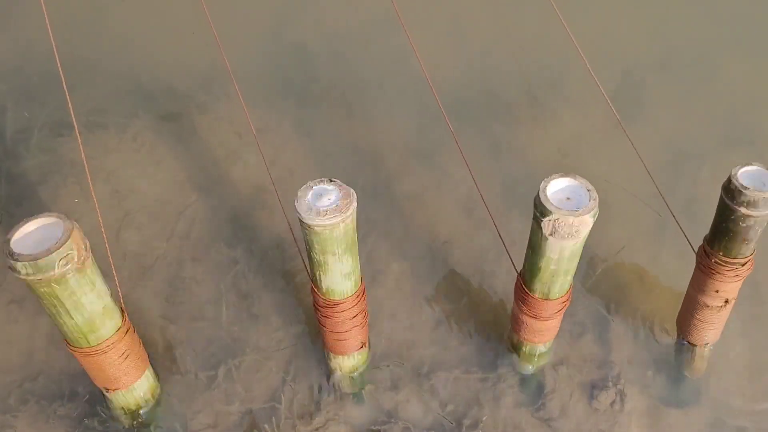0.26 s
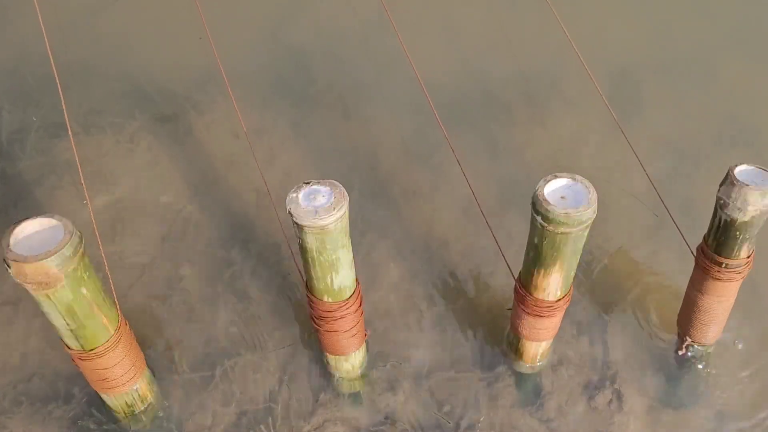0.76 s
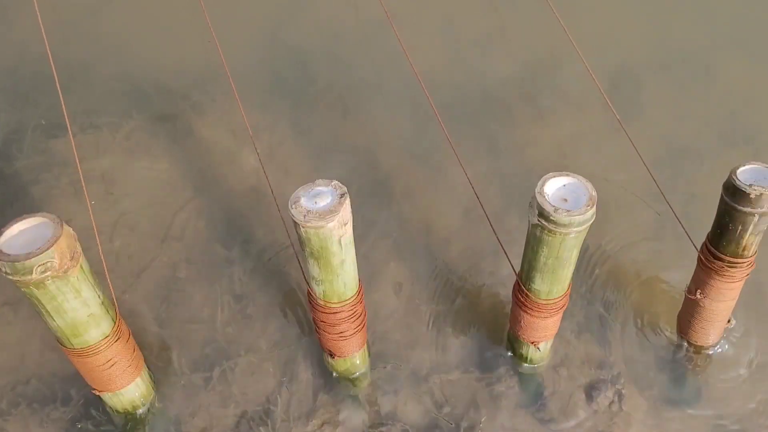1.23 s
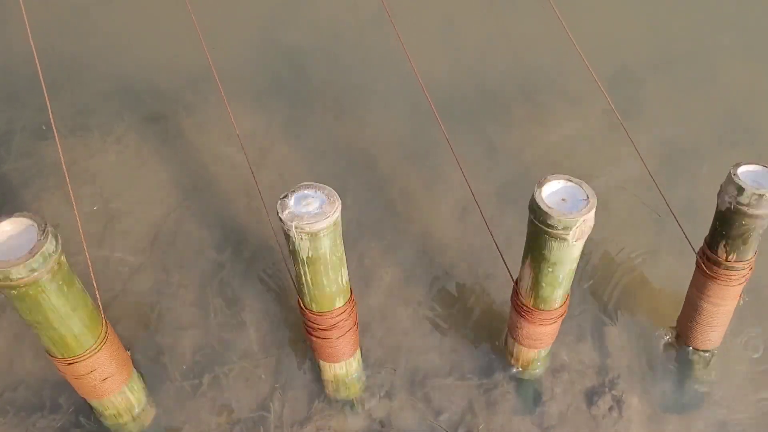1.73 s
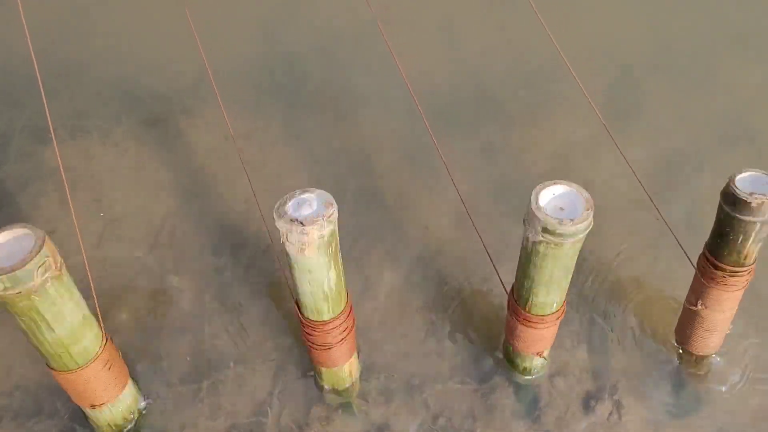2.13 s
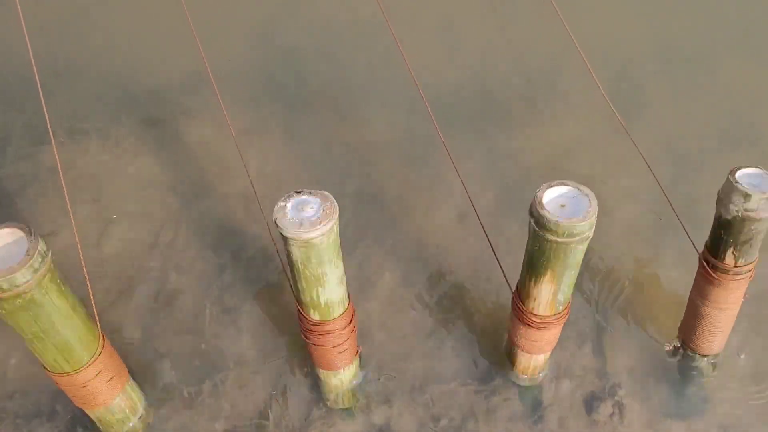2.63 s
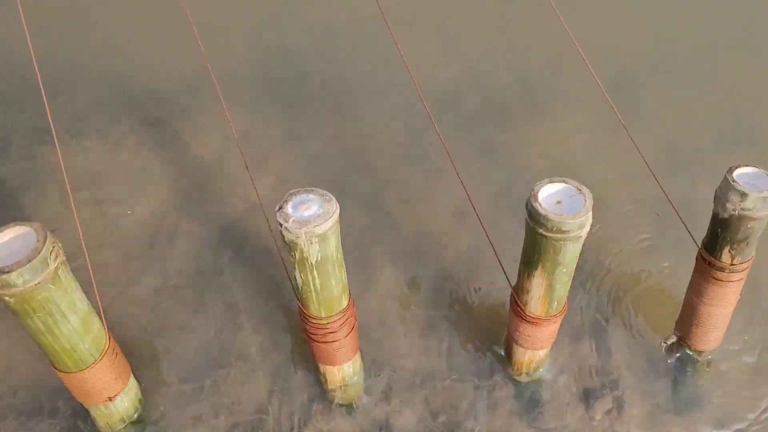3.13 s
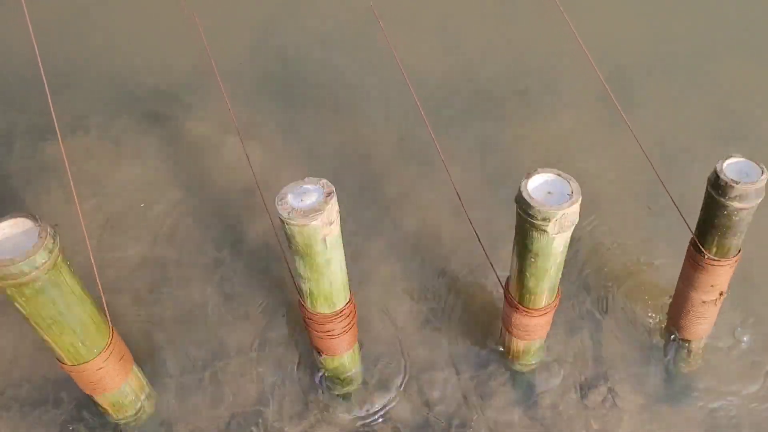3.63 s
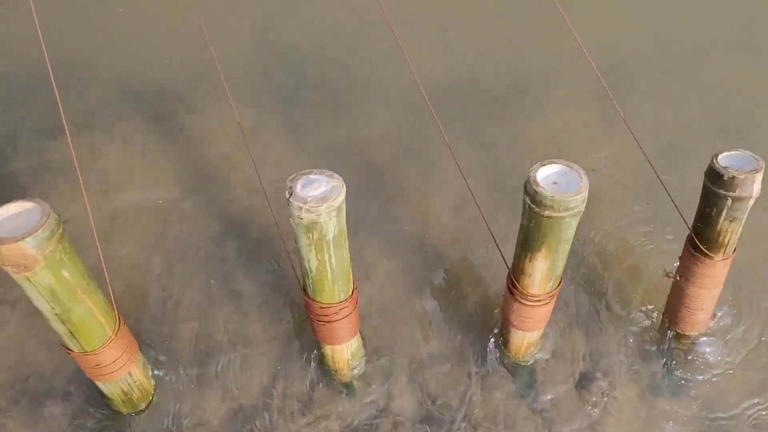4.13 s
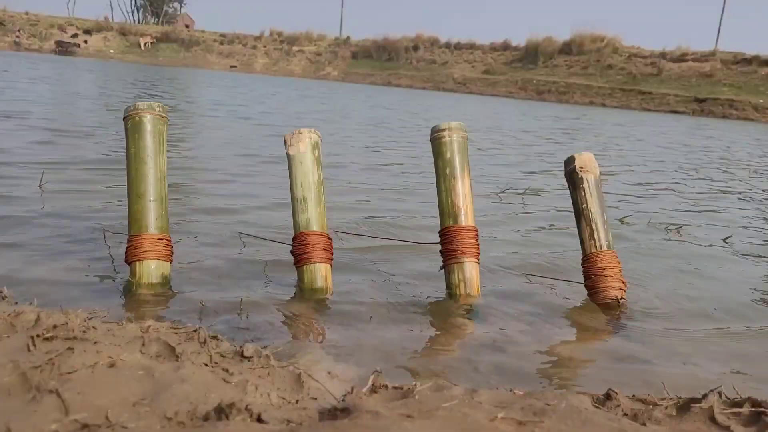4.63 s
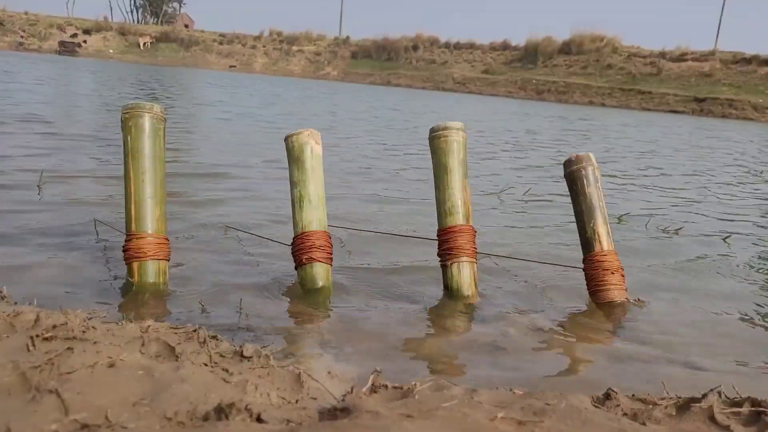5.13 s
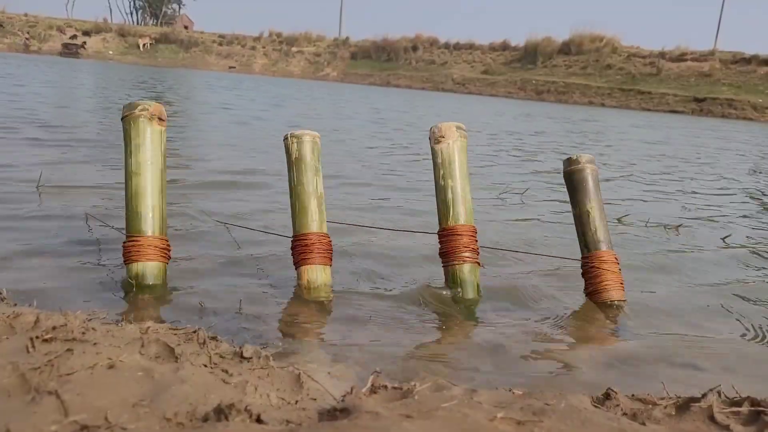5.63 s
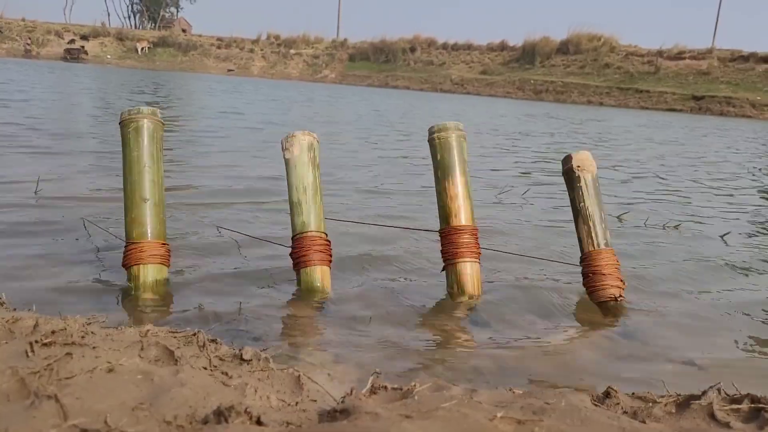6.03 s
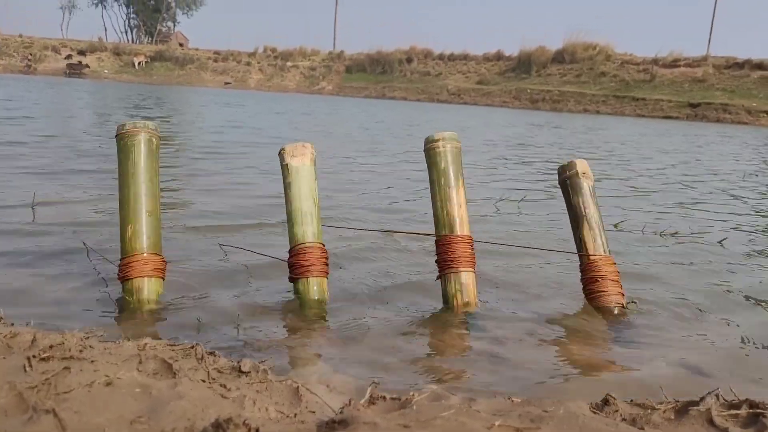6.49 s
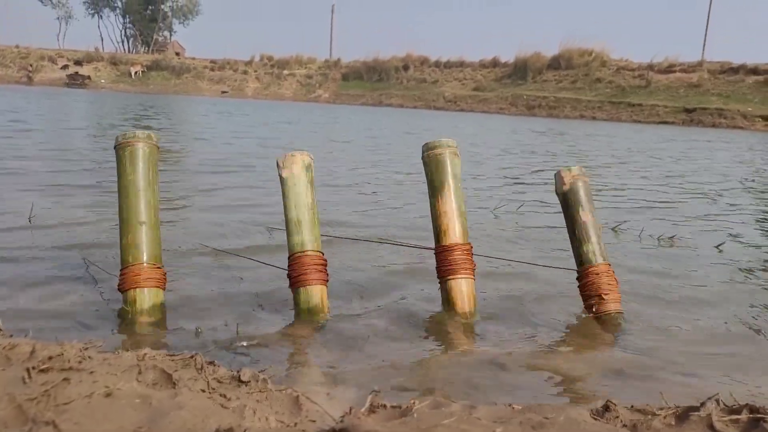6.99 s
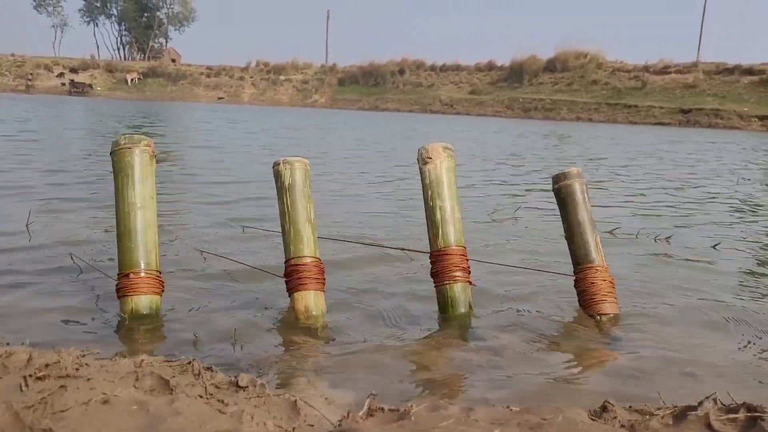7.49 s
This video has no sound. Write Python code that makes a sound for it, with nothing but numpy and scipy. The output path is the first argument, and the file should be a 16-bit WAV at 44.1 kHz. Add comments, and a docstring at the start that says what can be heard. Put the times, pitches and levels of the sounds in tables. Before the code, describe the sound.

From 0 to about 3.3 s it is quiet at a pond's edge: soft lapping, thin slosh and fine spray, faint low wind buffets, and tiny bright droplet ticks. Ripples slap hollow bamboo stakes in clusters, around 0.5-0.7 s and 1.85-2.35 s, each a dull thud with a very short high woody ring. From 3.3 s the slaps crowd together, with gurgling, upward-gliding bubbles and firmer gusts, peaking near 4.1-4.45 s. At 4.5 s it sinks and is cut to a few hundredths of a second of silence. From 4.6 s another spot fades in quickly: a distant, muffled single-cylinder diesel thumps evenly, about ten beats a second, to the end at 7.75 s, with low rumble and a wavering drone that grows. Wind thumps the microphone strongest around 4.7-5.2 and 5.8-6.2 s; water stays faint, with occasional drips.

```python
"""At a pond's edge, wind buffets two microphone ports while ripples lap, slosh and spray (filtered noise).
Droplets tick (short bright noise), ripples slap hollow bamboo stakes (thuds and rings), bubbles sing (gliding tones).
At 4.5 s this sinks and is cut to a short silence; a second spot then fades in, with a far machine's drone.
There a slow single-cylinder diesel thumps about ten times a second: each cycle is a row of ringing gas pushes."""
import sys
import numpy as np
from scipy import signal
from scipy.io import wavfile
from scipy.ndimage import uniform_filter1d

SR = 44100
rng = np.random.default_rng(int(sys.argv[2]) if len(sys.argv) > 2 else 0)


def transcribe(signal):
    """Save signal, clipped to [-1, 1], as a 16-bit WAV file at the path in sys.argv[1]."""
    frames = np.atleast_2d(signal).T
    limited = np.clip(frames, -1, 1)
    pcm = np.round(limited * 32767).astype(np.int16)
    wavfile.write(sys.argv[1], SR, pcm)


N = 341775
T = np.arange(N) / SR
SECOND_SPOT_S = 4.592  # the second spot begins here


def undb(db):
    """Gain of a level in dB."""
    return 10 ** (np.asarray(db) / 20)


def unit(x):
    """Scale to rms 1."""
    return x / np.sqrt(np.mean(x ** 2))


def peak_one(x):
    """Scale each channel to a peak of 1."""
    return x / np.abs(x).max(axis=-1, keepdims=True)


def curves(table):
    """Columns of a timed table, drawn as lines with one value a sample."""
    s, *columns = np.transpose(table)
    return [np.interp(T, s, c) for c in columns]


def band(x, lo_hz, hi_hz, order=2):
    """Keep only the sound between two frequencies."""
    return signal.sosfilt(signal.butter(order, [lo_hz, hi_hz], "band", fs=SR, output="sos"), x)


def ring(x, hz, t60):
    """One tone that falls 60 dB in t60 seconds; an impulse of 1 peaks near 1."""
    r, w = np.exp(-np.log(1000) / (t60 * SR)), 2 * np.pi * hz / SR
    return signal.lfilter([0, np.sin(w)], [1, -2 * r * np.cos(w), r * r], x)


def walk(rate):
    """Random levels held 1 / rate seconds and joined by slopes; rms 1."""
    k = int(SR / rate)
    steps = np.repeat(rng.standard_normal(N // k + 1), k)
    return unit(uniform_filter1d(steps, k)[:N])


def add(out, s, sound):
    """Mix a short sound in at time s."""
    i = int(s * SR)
    out[..., i:i + sound.shape[-1]] += sound[..., :max(N - i, 0)]


def pan_gains(pan_db):
    """Gains of the left and right port, from left minus right in dB."""
    return undb(np.array([[pan_db], [-pan_db]]) / 2)


def ports(x, pan_db, lag_s):
    """The right port hears it a little later."""
    late = np.interp(T - lag_s, T, x)
    return np.array([x, late]) * pan_gains(pan_db)


def after(rows, under_db, fall_s):
    """Envelope that jumps at each event, under_db from its peak, and dies away."""
    kicks = np.zeros(N)
    for s, db, *_ in rows:
        add(kicks, s, undb([db + under_db]))
    return signal.lfilter([1], [1, -np.exp(-1 / (fall_s * SR))], kicks)


def grains(points, per_s, scatter_db, smear_s, hush_db, flicker_db, like):
    """Third-octave bands of short noisy pops over a bed of noise; an octave shares its pops."""
    hz_at, db_at = np.transpose(points)
    out, shared, fall = 0, walk(25), np.exp(-1 / (smear_s * SR))
    octaves = np.arange(1 / 6, np.log2(hz_at[-1] / hz_at[0]), 1 / 3)
    for step, hz in enumerate(hz_at[0] * 2 ** octaves):
        if step % 3 == 0:
            sizes = undb(scatter_db * np.minimum(rng.exponential(size=N), 3))
            starts = (rng.random(N) < per_s / SR) * sizes
            pops = unit(signal.lfilter([1], [1, -fall], starts))
            raw = (pops + undb(hush_db)) * rng.standard_normal((2, N))
            # the right port is partly a copy of the left, 7 samples late
            raw[1] = like * np.roll(raw[0], 7) + np.sqrt(1 - like ** 2) * raw[1]
        db = np.interp(np.log(hz), np.log(hz_at), db_at) + flicker_db * shared + 2.0 * walk(20)
        slice_ = band(raw, hz * 2 ** (-1 / 6), hz * 2 ** (1 / 6), order=3)
        out = out + (-1) ** step * undb(db) * slice_
    return unit(out)


# Gusts buffeting the ports. Each row: start in seconds, length in seconds, level in dB, left minus right in dB.
GUST_ROWS = [(0.0, 0.095, -53, -5), (0.242, 0.02, -46, -22), (0.35, 0.028, -51, -27),
             (0.68, 0.074, -55.5, -14.5), (0.817, 0.19, -52, -14.5), (1.09, 0.17, -47.5, -15),
             (1.344, 0.017, -48.5, -10), (1.644, 0.2, -52, -6), (2.44, 0.2, -50.5, -5.5),
             (3.018, 0.16, -44, 4.5), (3.327, 0.11, -39.5, -8.5), (3.492, 0.25, -41.5, -11.5),
             (4.036, 0.13, -40.5, -20), (4.176, 0.034, -32.5, -20.5), (4.248, 0.12, -34.5, -20.5),
             (4.384, 0.14, -32.5, -16.5), (4.662, 0.4, -34.5, 2.5), (5.118, 0.038, -29, -9.5),
             (5.252, 0.79, -41, 11), (5.779, 0.4, -32, -4), (6.196, 0.15, -52, -2)]
GUST_RISE_S, GUST_FALL_S = 0.019, 0.042
FIRST_LULL_DB, SECOND_LULL_DB = -57, -44  # breeze between gusts at each spot


def wind():
    """Eddies thud on each port on their own; a harder gust reaches higher in pitch."""
    out = []
    for side in (1, -1):
        gain = undb(np.where(T < SECOND_SPOT_S, FIRST_LULL_DB, SECOND_LULL_DB))
        for s, length, db, pan_db in GUST_ROWS:
            rise = np.clip((T - s) / GUST_RISE_S + .5, 0, 1)
            fall = np.exp(-np.maximum(T - s - length, 0) / GUST_FALL_S)
            gain = np.hypot(gain, undb(db + side * pan_db / 2) * rise * fall)
        low = unit(band(rng.standard_normal(N), 39.1, 95.6, order=3)) * undb(2.94 * walk(15))
        high = unit(band(rng.standard_normal(N), 86.6, 202)) * undb(4.15 * walk(30))
        high_share = undb(-4.0) * (gain / undb(-22.0)) ** 0.62
        out.append(gain * (low + high_share * high))
    return np.array(out)


# Ripples among the stakes, first spot. Each row: time in seconds, lapping in dB, slosh in dB, spray in dB.
RIPPLE_LEVELS = [(0.0, -68, -62.5, -63.5), (0.62, -64, -57, -57.5), (1.68, -66.5, -64.5, -65),
                 (2.12, -60, -61.5, -63), (2.47, -68, -61, -61), (3.37, -60.5, -60, -62.5),
                 (3.55, -54, -56, -58), (4.06, -54, -49, -51.5), (4.25, -49, -49.5, -47),
                 (4.35, -49.5, -45, -48.5), (4.46, -55, -56, -60)]
# Water at the second spot. Each row: time in seconds, far drone in dB, slosh in dB, spray in dB.
SHORE_LEVELS = [(4.6, -57.5, -61, -66), (4.9, -60.5, -59.5, -62), (5.8, -56.5, -63.5, -61),
                (6.7, -54, -63.5, -63.5), (7.75, -49.5, -62.5, -61)]


def water_levels():
    """Lapping, slosh and spray in dB; lapping stops just as the second spot begins."""
    return np.where(T < SECOND_SPOT_S, curves(RIPPLE_LEVELS), curves(SHORE_LEVELS))


def churn():
    """Each large slap churns the water for a moment."""
    return after(SLAP_ROWS, under_db=-27, fall_s=.015)


# Tone balance of the lapping. Each row: frequency in Hz, relative level in dB per Hz.
LAP_BALANCE = [(200, 3.5), (350, -5), (650, -6), (950, -5), (1200, -19)]


def lapping():
    """Low, slow pops of water, nearly alike on both ports, swelling after each slap."""
    level = undb(water_levels()[0]) + churn()
    return level * grains(LAP_BALANCE, 45, 4.7, 0.0039, -1.7, 2.3, 0.94) * (T < 4.6)


# Tone balance of the slosh. Each row: frequency in Hz, relative level in dB per Hz.
SLOSH_BALANCE = [(1400, -1.5), (1800, 6.5), (2200, -10), (2700, 7.5), (3300, 1), (4500, -0.5), (6500, -14)]
CHURN_TREBLE_DB = -5  # share of the churn in the slosh


def slosh():
    """Denser, brighter pops of water, also swelling after each slap."""
    level = undb(water_levels()[1]) + undb(CHURN_TREBLE_DB) * churn()
    return level * grains(SLOSH_BALANCE, 150, 4.5, 0.0031, 0.71, 1.0, 0.33)


# Tones of a bamboo stake. Each row: frequency in Hz, relative level in dB, seconds to fall 60 dB.
STAKE_MODES = [(1554, -17, 0.077), (1680, -31, 0.016), (1815, -6.5, 0.04), (1830, -1.5, 0.081),
               (1867, -9, 0.038), (2950, -12, 0.04), (3260, -6.5, 0.05), (3880, -12.5, 0.032)]
STAKE_LOW_HZ = 1430  # the tube radiates little below this
RING_LAG_S = .00023  # the right port hears the ring this late


def stake(x, tune=1):
    """The hollow bamboo rings at its modes."""
    tones = sum(undb(db) * ring(x, hz * tune, t60) for hz, db, t60 in STAKE_MODES)
    return band(tones, STAKE_LOW_HZ, 9000, order=4)


def stake_hum():
    """The slosh keeps the stakes humming with random taps over steady noise."""
    sizes = undb(9.4 * np.minimum(rng.exponential(size=N), 2))
    taps = unit((rng.random(N) < 90 / SR) * sizes) + 1.3 * rng.standard_normal(N)
    over_slosh_db = np.where(T < 4.6, 0.5, -8)
    return ports(unit(stake(taps)), -8.0, RING_LAG_S) * undb(water_levels()[1] + over_slosh_db)


# Tone balance of the spray. Each row: frequency in Hz, relative level in dB per Hz.
SPRAY_BALANCE = [(5000, 7), (7000, 11.5), (9000, 7), (12000, 7), (16000, -6)]
MIST_DB, MIST_S = -18, 0.0061  # spray thrown up with each droplet: under its peak, and its decay


def spray():
    """Fine high pops, almost unrelated on the two ports, with a burst at each droplet."""
    hiss = grains(SPRAY_BALANCE, 110, 1.3, 0.002, 2.7, 1.0, 0.02)
    # the left port faces the spray and keeps its highest treble
    hiss[0] += undb(3.5) * band(hiss[0], 11470, 22000)
    return (undb(water_levels()[2]) + after(TICK_ROWS, MIST_DB, MIST_S)) * hiss


# Droplets ticking. Each row: time in seconds, peak in dB midway between ports, pitch in Hz, left minus right in dB.
TICK_ROWS = [(0.0457, -33.5, 13650, 9), (0.285, -34.5, 13200, 5), (0.4553, -40, 12900, 14),
             (0.563, -49, 12300, 27), (0.7522, -45, 12700, 18), (1.3588, -43, 10200, 0.5),
             (1.8936, -48, 12100, 1.0), (1.949, -44, 11800, 8), (2.474, -40, 12700, -2),
             (3.5647, -32.5, 11050, 6), (3.817, -40, 11400, 20), (3.9863, -38, 6640, -19),
             (4.0135, -37, 7000, -2), (4.2345, -39, 7300, -6), (4.43, -35, 12100, 6),
             (4.4894, -40, 7200, 0), (4.8583, -44, 12500, -8), (4.9603, -44.5, 7750, 0.0),
             (5.66, -40.5, 8100, 12), (6.687, -52, 11400, 12), (7.2315, -48, 11400, 8),
             (7.626, -42, 12300, 4.5)]


def ticks():
    """Tiny droplets: a few milliseconds of bright noise."""
    out, t = np.zeros((2, N)), np.arange(600) / SR
    for s, db, hz, pan_db in TICK_ROWS:
        burst = rng.standard_normal((2, len(t))) * np.exp(-t / 0.0029)
        tick = band(burst, hz * 0.96, min(hz * 1.07, 16000), order=1)
        add(out, s, undb(db) * pan_gains(pan_db) * peak_one(tick))
    return out


PATTER_OVER_LAP_DB, PATTER_RING_DB = 13.5, -3  # strongest slap over the lapping; its ring over its thud


def patter():
    """Many small random slaps that follow the lapping level, as rows like those of the large slaps."""
    when, pitch, weak, dull = rng.random((170, 4)).T
    when = 4.5 * when ** 0.62  # more of them later on
    db = curves(RIPPLE_LEVELS)[0][(when * SR).astype(int)] + PATTER_OVER_LAP_DB - 12 * weak
    return np.transpose([when, db, 400 * 2.4 ** pitch, db + PATTER_RING_DB - 2.9 * dull])


# Ripples slapping the stakes. Each row: time in seconds, thud peak in dB, thud pitch in Hz, stake ring in dB rms;
# both levels are midway between the ports.
SLAP_ROWS = [(0.456, -46.5, 354, -51), (0.505, -34.5, 720, -37.5), (0.511, -36, 1310, -55),
             (0.518, -42, 720, -57), (0.558, -46, 660, -69), (0.627, -48, 680, -65),
             (0.648, -32.5, 980, -38.5), (0.655, -37.5, 800, -43.5), (0.694, -52, 570, -51),
             (0.708, -47, 600, -48), (0.785, -59, 900, -55), (1.31, -46, 570, -68), (1.366, -44, 654, -52),
             (1.849, -46, 834, -47), (1.878, -45, 764, -61), (1.965, -47, 720, -58), (1.977, -40, 700, -44),
             (1.997, -45, 550, -46), (2.014, -39.5, 800, -62), (2.032, -42, 790, -53),
             (2.057, -52, 600, -45), (2.112, -56, 550, -63), (2.147, -46, 650, -55),
             (2.18, -39.5, 650, -51), (2.243, -34.5, 690, -40.5), (2.258, -37.5, 700, -59),
             (2.266, -61, 600, -74), (2.284, -61, 900, -74), (2.3, -61, 700, -67), (2.315, -48, 650, -73),
             (2.332, -42, 690, -70), (2.475, -48, 729, -49), (2.79, -46.5, 674, -60),
             (2.841, -41.5, 750, -53), (2.864, -46, 594, -53), (2.924, -46, 510, -62),
             (3.019, -46, 318, -49.5), (3.333, -46, 570, -44.5), (3.419, -37.5, 600, -44),
             (3.588, -48, 633, -44), (3.619, -34, 725, -42), (3.566, -42, 600, -50),
             (3.645, -41, 600, -34.5), (3.67, -43, 393, -44), (3.712, -44, 600, -49),
             (3.727, -36, 725, -35), (3.802, -41, 810, -44), (3.817, -37, 848, -37), (3.874, -46, 450, -51),
             (3.897, -39, 570, -45), (3.921, -40, 573, -36), (3.943, -46, 630, -42), (3.973, -50, 700, -57),
             (3.982, -53, 592, -41), (4.038, -38, 684, -34), (4.083, -36, 650, -44),
             (4.097, -33, 554, -29.5), (4.133, -36, 800, -35.5), (4.152, -29, 910, -46),
             (4.164, -29, 600, -50.5), (4.212, -40, 800, -58), (4.226, -31, 730, -51),
             (4.236, -42, 890, -50), (4.246, -27, 724, -31.5), (4.257, -24, 1300, -30.5),
             (4.267, -31, 900, -57), (4.3, -39, 536, -46), (4.337, -31, 1000, -44),
             (4.343, -30.5, 1100, -55), (4.366, -28, 600, -33.5), (4.383, -32, 1200, -45),
             (4.403, -33, 574, -57), (4.413, -31, 900, -47), (4.436, -31.5, 1100, -48),
             (4.467, -41, 507, -41)]
BLOW_S, BLOW_EDGE, BLOW_TOP_HZ = .004, 3.5, 2200  # decay; sharp first contact; water is soft above this
SPLAT_DB, SPLAT_S = -9, .007  # ragged tail of each thud
CRACK_DB = -4  # crack's peak over the ring's level
STAKE_SPREAD = .008  # each blow lands on another stake, a little off in pitch
THUD_CYCLES = 6  # cycles for a thud to fall 60 dB
THUD_PAN_DB, RING_PAN_DB, PAN_SPREAD_DB = 0.5, -4.5, 5.5  # left minus right, and its scatter
THUD_LAG_S = 0.00012  # right port late


def slaps():
    """A sharp, dull thud with a ragged tail and a few-millisecond crack, while the stake rings."""
    out, t = np.zeros((2, N)), np.arange(3500) / SR
    soft = signal.butter(2, BLOW_TOP_HZ, fs=SR, output="sos")
    for s, db, hz, ring_db in np.vstack([SLAP_ROWS, patter()]):
        blow, splat = rng.standard_normal((2, len(t)))
        blow = blow * np.exp(-t / BLOW_S)
        push = signal.sosfilt(soft, blow + BLOW_EDGE * (t == 0))
        crack = band(blow, 1800, 4500)
        tone = stake(push, 1 + STAKE_SPREAD * blow[0])
        splat = band(splat * np.exp(-t / SPLAT_S), hz * 0.53, hz * 1.78)
        knock = band(ring(1. * (t == 0), hz, THUD_CYCLES / hz), hz / 2, hz * 2, order=1)
        thud = np.sign(blow[0]) * peak_one(knock) + undb(SPLAT_DB) * peak_one(splat)
        thud = undb(db) * peak_one(thud)
        # the ring's level is that of its first 10 ms
        bright = undb(CRACK_DB) * peak_one(crack) + tone / tone[:SR // 100].std()
        bright = undb(ring_db) * bright
        scatter_db = PAN_SPREAD_DB * rng.standard_normal()
        for sound, pan_db, lag_s in ((thud, THUD_PAN_DB, THUD_LAG_S), (bright, RING_PAN_DB, RING_LAG_S)):
            left, right = pan_gains(pan_db + scatter_db) * sound
            add(out[0], s, left)
            add(out[1], s + lag_s, right)
    return out


def froth():
    """Small random bubbles that follow the lapping level, as rows like those of the large ones."""
    when, size, rise, life, weak = rng.random((70, 5)).T
    when = 4.5 * when ** 0.4  # most of them later on
    start_hz = 450 * 3.2 ** size
    end_hz = start_hz * (0.94 + 1.02 * rise ** 2)
    length = (8 + 14 * life) / start_hz
    db = curves(RIPPLE_LEVELS)[0][(when * SR).astype(int)] + 4 - 9 * weak
    return np.transpose([when, start_hz, end_hz, length, db])


# Bubbles. Each row: time in seconds, start pitch in Hz, end pitch in Hz, length in seconds, level in dB.
BUBBLE_ROWS = [(0.953, 702, 613, 0.074, -54), (1.304, 457, 740, 0.028, -46),
               (1.532, 753, 663, 0.042, -52.5), (2.162, 691, 650, 0.021, -49),
               (3.044, 558, 564, 0.034, -48.5), (3.292, 700, 790, 0.035, -53), (3.75, 587, 617, 0.038, -43),
               (3.938, 503, 2000, 0.021, -42.5), (4.035, 2690, 3350, 0.012, -42),
               (4.053, 477, 1920, 0.03, -34), (4.1, 1900, 3030, 0.049, -33), (4.164, 530, 1280, 0.021, -37),
               (4.225, 2820, 2850, 0.013, -36), (4.24, 600, 1500, 0.028, -36),
               (4.252, 1070, 2500, 0.019, -32), (4.295, 600, 1100, 0.0075, -43),
               (4.37, 1540, 1530, 0.022, -33), (4.14, 690, 1100, 0.018, -46),
               (4.394, 553, 1400, 0.013, -40), (4.413, 1550, 1560, 0.016, -34),
               (4.435, 1510, 1570, 0.017, -30.5), (4.484, 950, 1800, 0.022, -41.5)]
GLIDE_BEND, WOBBLE_DB = 2.1, 4  # pitch moves slowly, then quickly; the level wavers


def bubbles():
    """Trapped air sings a short glide as it nears the surface."""
    out = np.zeros(N)
    for s, start_hz, end_hz, length, db in np.vstack([BUBBLE_ROWS, froth()]):
        u = np.linspace(0, 1, int(length * SR))
        waver = np.interp(u, np.linspace(0, 1, 8), rng.standard_normal(8))
        wobble = unit(undb(WOBBLE_DB * waver))
        swell = np.sqrt(np.sin(np.pi * u) + 1e-9)
        hz = start_hz * (end_hz / start_hz) ** u ** GLIDE_BEND
        tone = np.sin(2 * np.pi * np.cumsum(hz) / SR)
        add(out, s, undb(db) * wobble * swell * tone)
    return ports(out, -0.21, 0.00023)


# Far machine casing. Each row: frequency in Hz, half width in Hz, relative level in dB,
# right port late in milliseconds, likeness of the ports from 0 to 1.
DRONE_BANDS = [(610, 220, -11, 0.24, .8), (950, 55, 7.5, 0.39, 0.91), (1373, 37, 3, 0.38, 0.85),
               (1560, 70, 0, 0.31, 0.34), (1846, 33, 8, 0.15, 0.47), (2500, 280, -0.5, .2, 0.16),
               (3260, 44, -3.5, 0.18, 0.35)]
DRONE_PAN_DB, DRONE_FLICKER_DB = 3.5, 3  # left minus right; wavering of each band


def drone():
    """Wavering resonances of a far machine, partly scattered by the banks."""
    out = 0
    for hz, width, db, lag_ms, like in DRONE_BANDS:
        noise = rng.standard_normal((3, N))
        direct, *scattered = unit(band(noise, hz - width, hz + width, order=1))
        both = np.sqrt(like) * ports(direct, 0, lag_ms / 1000) + np.sqrt(1 - like) * np.array(scattered)
        out = out + undb(db + DRONE_FLICKER_DB * walk(20)) * both
    level = undb(curves(SHORE_LEVELS)[0]) * (T > SECOND_SPOT_S)
    return unit(out) * pan_gains(DRONE_PAN_DB) * level


def bank_rumble():
    """Engine rumble scattered by the banks: steady low noise, unlike on the two ports."""
    return undb(-47.5) * unit(band(rng.standard_normal((2, N)), 95, 454)) * (T > SECOND_SPOT_S)


# Firings counted along the run. Each row: time in seconds, firing number; those between are evenly spaced.
FIRING_TIMES = [(4.678, 0), (5.086, 4), (5.7021, 10), (6.9311, 22), (7.757, 30)]
# One engine cycle, in row order: piston heave, valve bump, intake gulp, valve bump, exhaust bang and its first puff,
# rattle, echo off the bank. Each row: milliseconds from the bang, push length in milliseconds, ring in Hz,
# milliseconds to fall 60 dB, middle level in dB before muffling, polarity.
CYCLE_PARTS = [(-43.5, 8, 70, 45, -33, 1), (-31.4, 3.5, 430, 6.5, -30, 1), (-24, 3.3, 121, 20, -23.5, 1),
               (-8.3, 2.3, 248, 16, -29, 1), (-2.9, 2.4, 272, 30, -15.2, -1), (-3.2, 1.3, 205, 6, -25.5, 1),
               (8.9, 2.3, 392, 28, -40, 1), (22, 1.5, 275, 45, -31, -1)]
# Engine strength. Each row: time in seconds, level change in dB.
ENGINE_LEVEL = [(4.6, 0.5), (5.5, 1.7), (6.5, 1.9), (7.2, 1), (7.75, 0)]


def engine():
    """Every cycle repeats the same gas pushes, each a little stronger or weaker; a rumble fills the gaps."""
    s, number = np.transpose(FIRING_TIMES)
    bangs = np.interp(np.arange(number[-1] + 1), number, s)
    chance = rng.standard_normal((len(bangs), len(CYCLE_PARTS), 2))
    out = np.zeros(N)
    for part, (ms, push_ms, hz, t60_ms, db, sign) in enumerate(CYCLE_PARTS):
        push = np.pad(np.hanning(int(push_ms * SR / 1000)), (0, 2600))
        for bang_s, (size, pitch) in zip(bangs, chance[:, part]):
            thump = ring(push, hz * (1 + .015 * pitch), t60_ms / 1000)
            add(out, bang_s + ms / 1000, sign * undb(db + 1.26 * size) * peak_one(thump))
    since = np.interp(T, s, number) % 1  # share of the cycle gone since the last firing
    rumble = undb(-41.5) * unit(band(rng.standard_normal(N), 142, 311))
    rumble = rumble * np.exp(-since / 0.76) * undb(3.6 * walk(30))
    puff = undb(-47.5) * unit(band(rng.standard_normal(N), 230, 505)) * np.exp(-since / 0.079)
    # distance and the muffler take the treble away
    muffler = signal.butter(4, 700, fs=SR, output="sos")
    out = signal.sosfilt(muffler, band(out, 42, 2700)) + rumble + puff
    return ports(out * undb(curves(ENGINE_LEVEL)[0]) * (T > 4.6), -1.7, 0.00029)


def scene():
    """Wind, water and stakes, then the far machine and the engine."""
    water = lapping() + slosh() + stake_hum() + spray()
    return wind() + water + ticks() + slaps() + bubbles() + drone() + bank_rumble() + engine()


FADE_OUT_S, FADE_OUT_DB, SILENT_S = 4.49, -16, 4.562  # fade begins, sinks this far, then is cut off
FADE_IN_S = 0.14  # length of the second spot's fade in
TOP_HZ = 15800  # nothing much is heard above this


def record(dry):
    """A fade out and in between the two spots, then the top is cut."""
    sink = np.clip((T - FADE_OUT_S) / (SILENT_S - FADE_OUT_S), 0, 1)
    fade_out = undb(FADE_OUT_DB * sink) * (T < SILENT_S)
    fade_in = np.clip((T - SECOND_SPOT_S) / FADE_IN_S, 0, 1) ** 2
    top_cut = signal.ellip(10, .2, 70, TOP_HZ, fs=SR, output="sos")
    return signal.sosfilt(top_cut, dry * (fade_out + fade_in))


dry = scene()
out = record(dry)
transcribe(out)
```